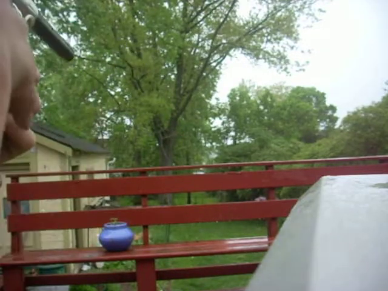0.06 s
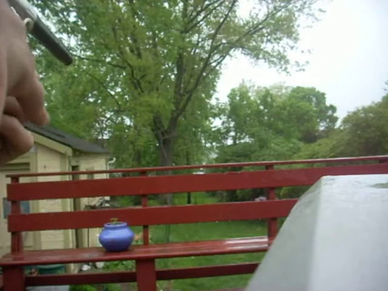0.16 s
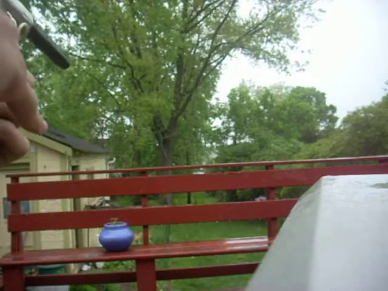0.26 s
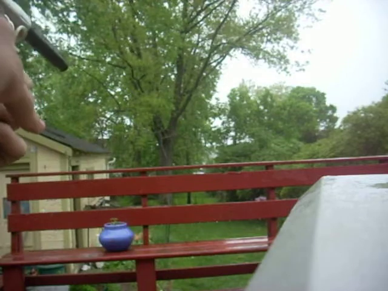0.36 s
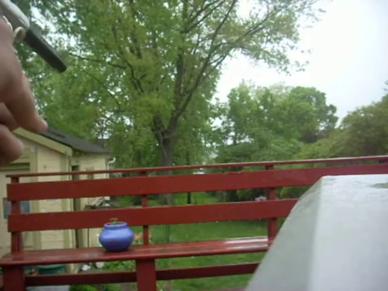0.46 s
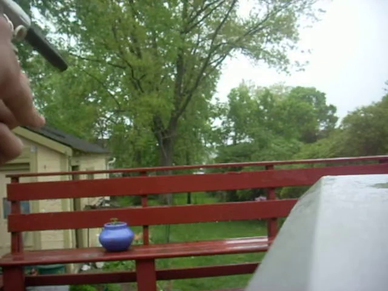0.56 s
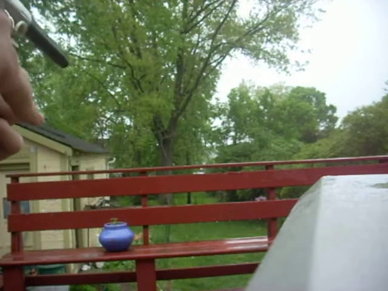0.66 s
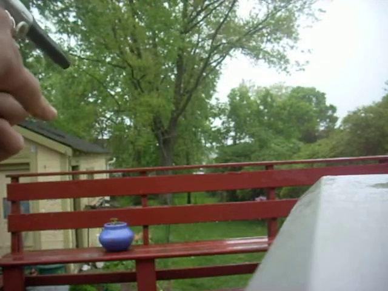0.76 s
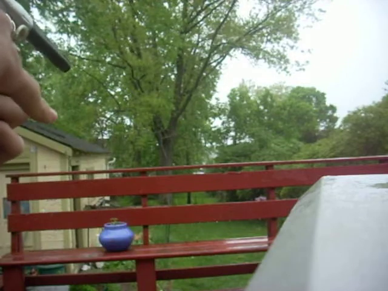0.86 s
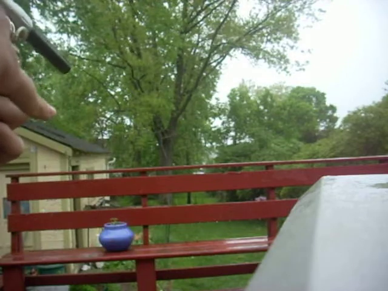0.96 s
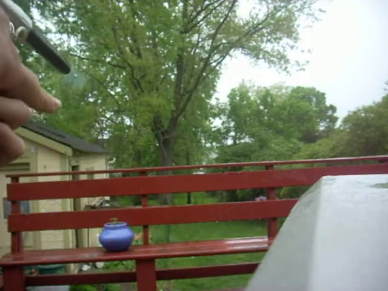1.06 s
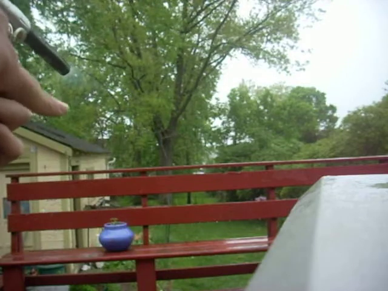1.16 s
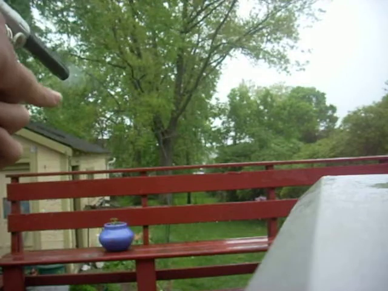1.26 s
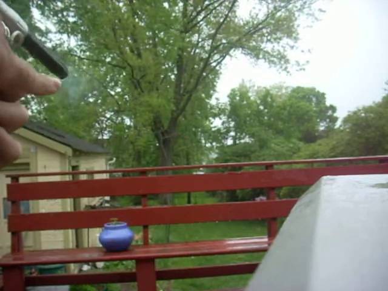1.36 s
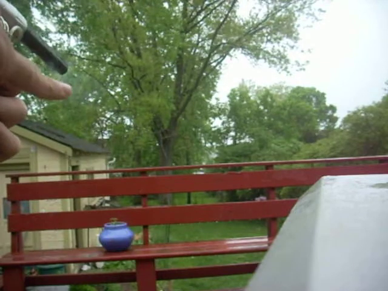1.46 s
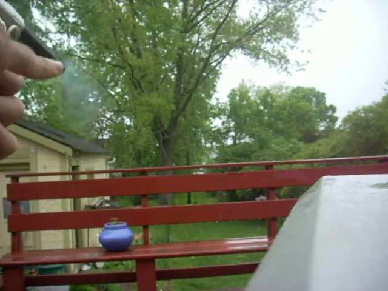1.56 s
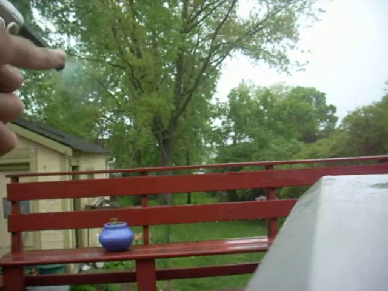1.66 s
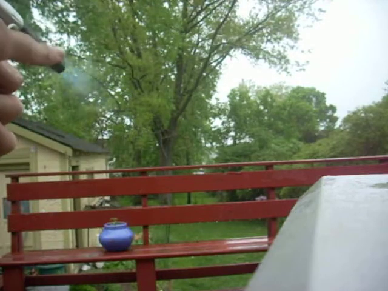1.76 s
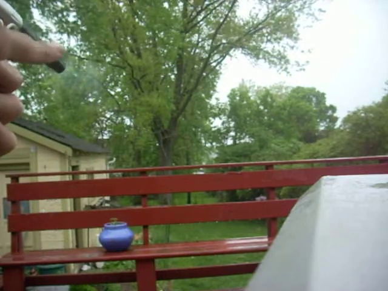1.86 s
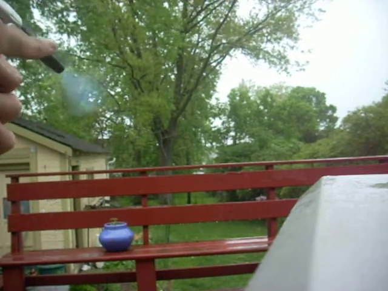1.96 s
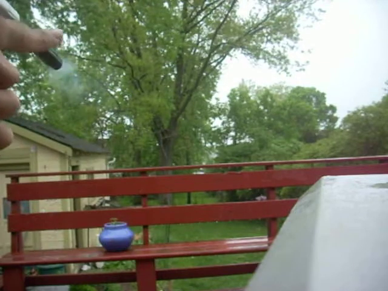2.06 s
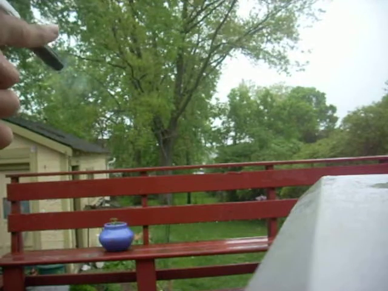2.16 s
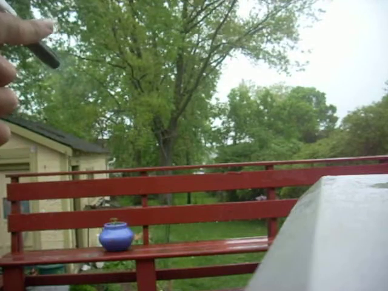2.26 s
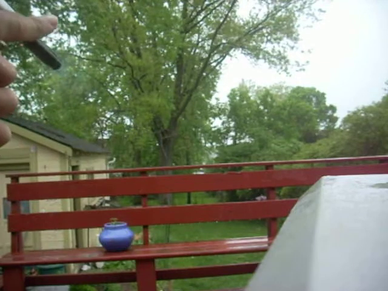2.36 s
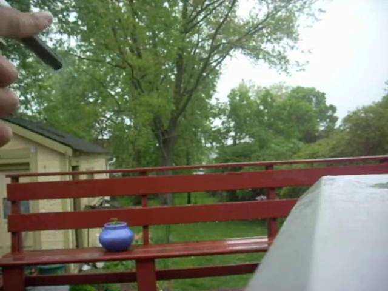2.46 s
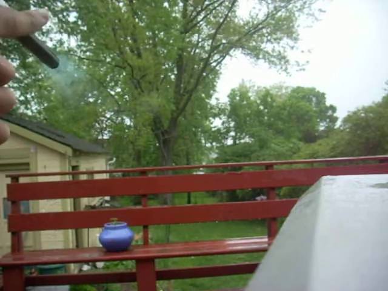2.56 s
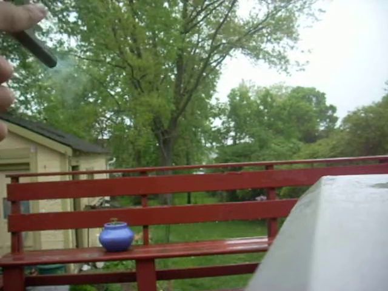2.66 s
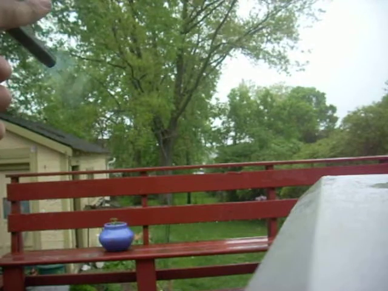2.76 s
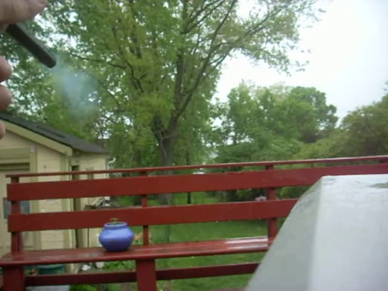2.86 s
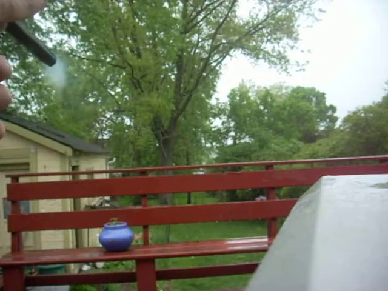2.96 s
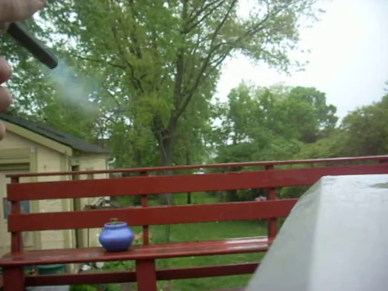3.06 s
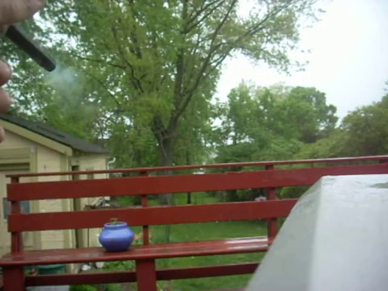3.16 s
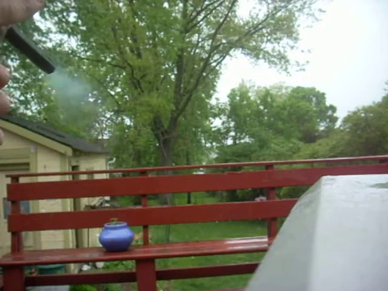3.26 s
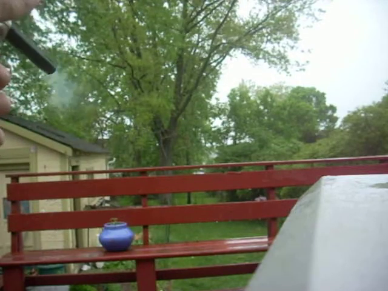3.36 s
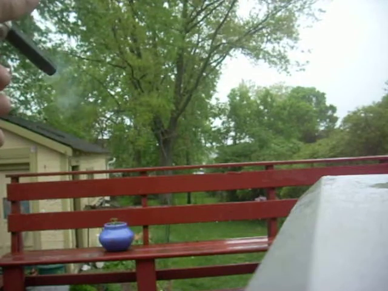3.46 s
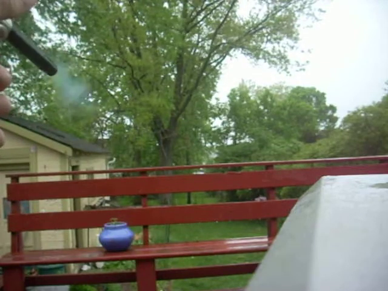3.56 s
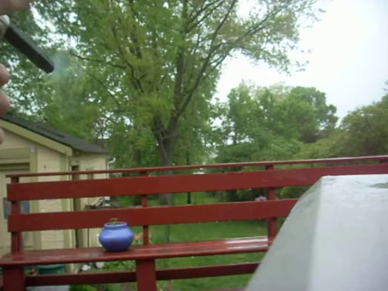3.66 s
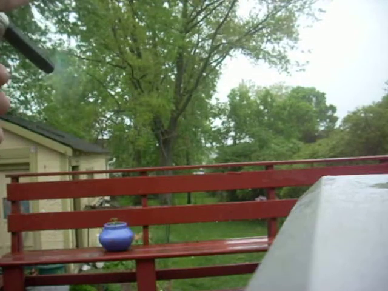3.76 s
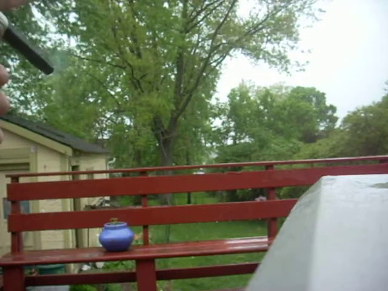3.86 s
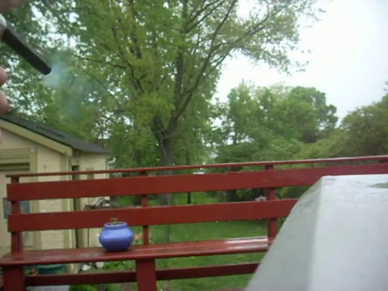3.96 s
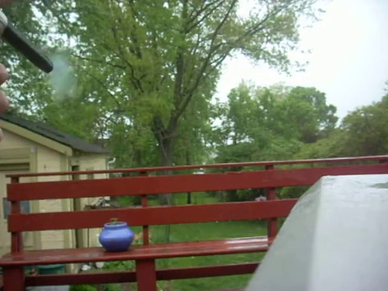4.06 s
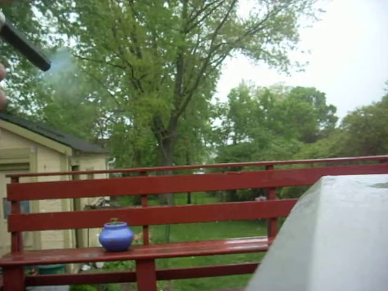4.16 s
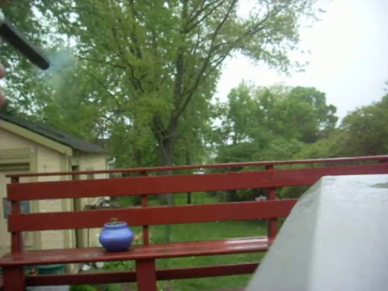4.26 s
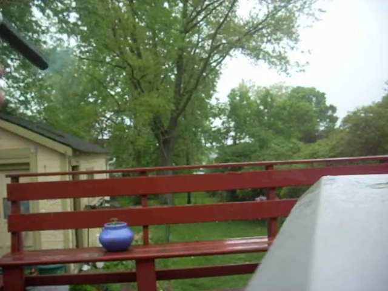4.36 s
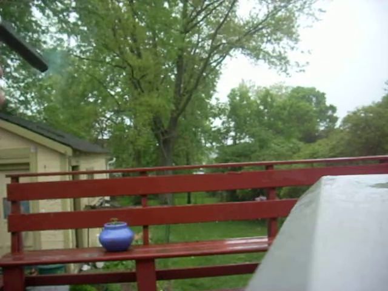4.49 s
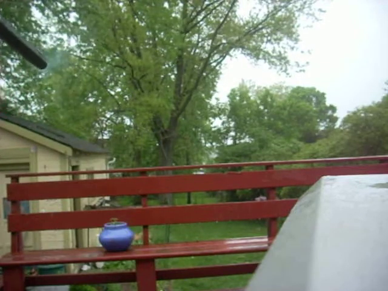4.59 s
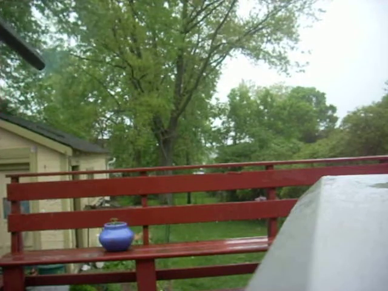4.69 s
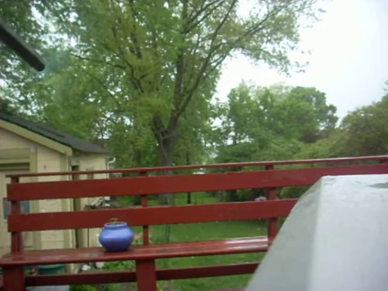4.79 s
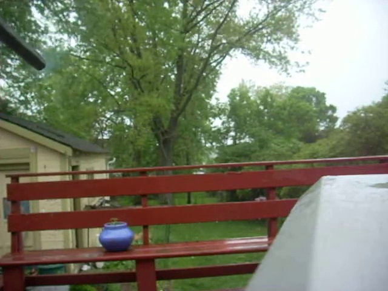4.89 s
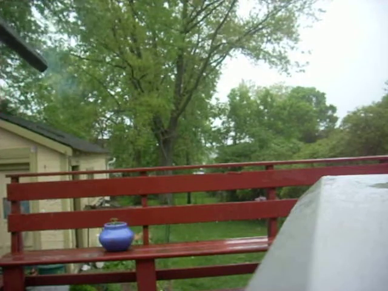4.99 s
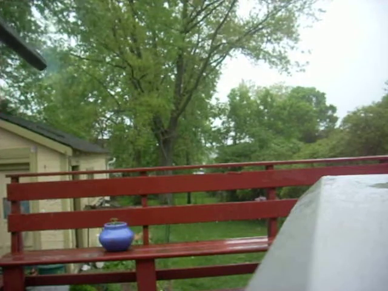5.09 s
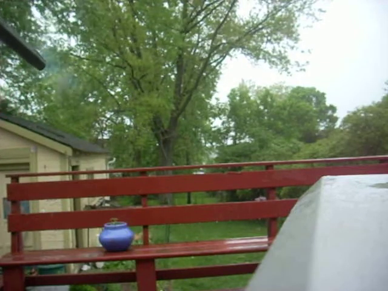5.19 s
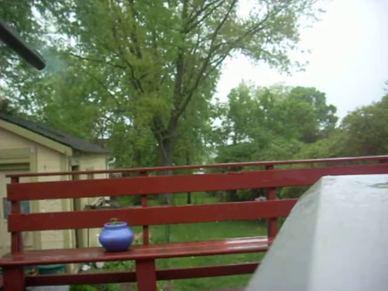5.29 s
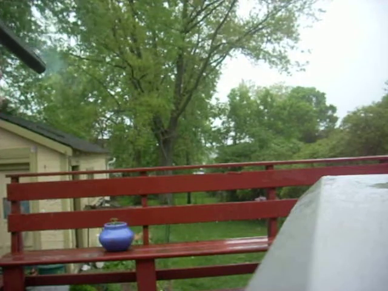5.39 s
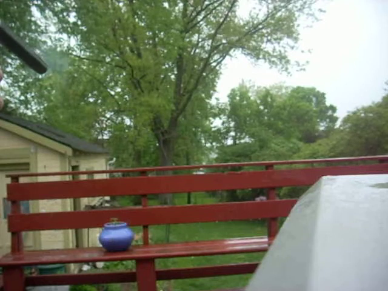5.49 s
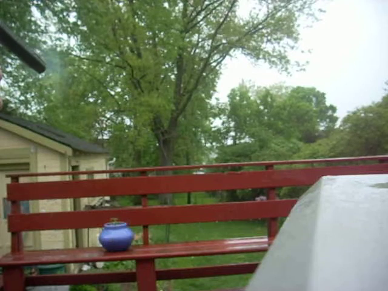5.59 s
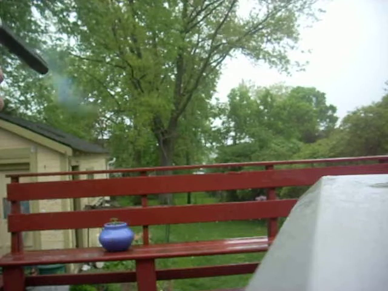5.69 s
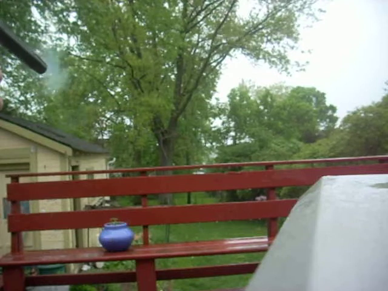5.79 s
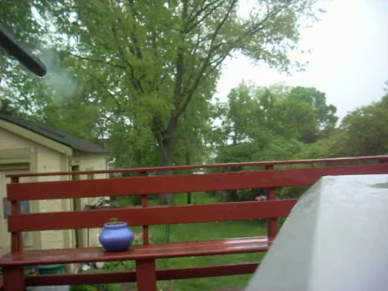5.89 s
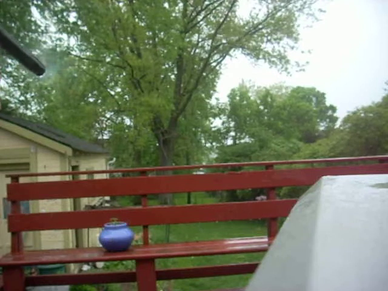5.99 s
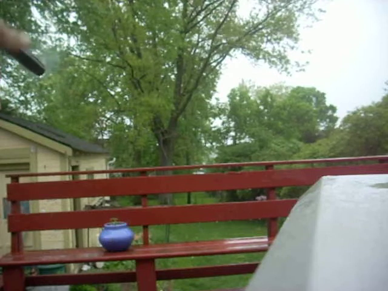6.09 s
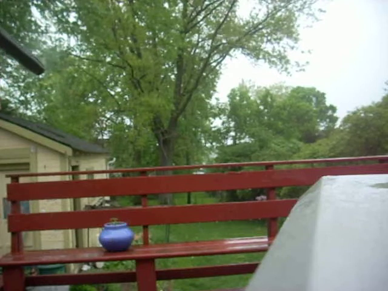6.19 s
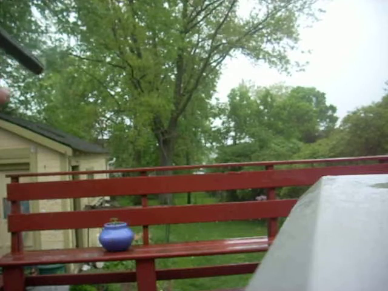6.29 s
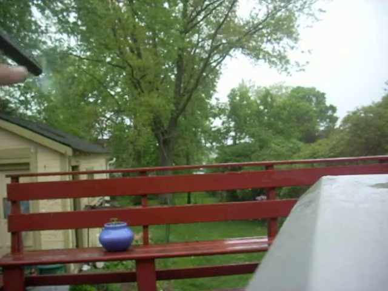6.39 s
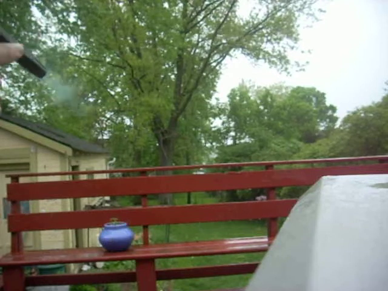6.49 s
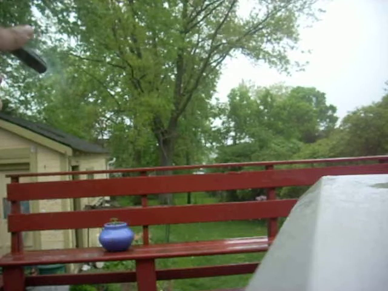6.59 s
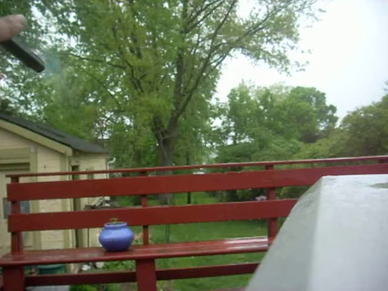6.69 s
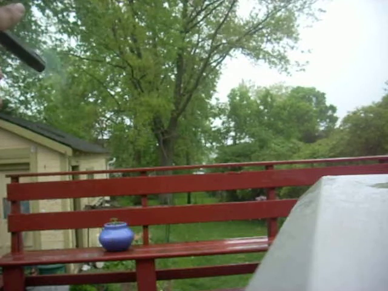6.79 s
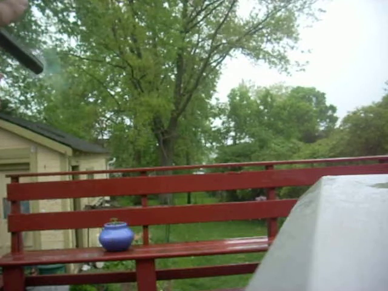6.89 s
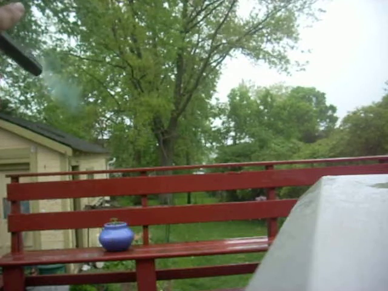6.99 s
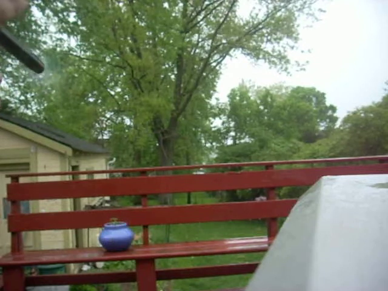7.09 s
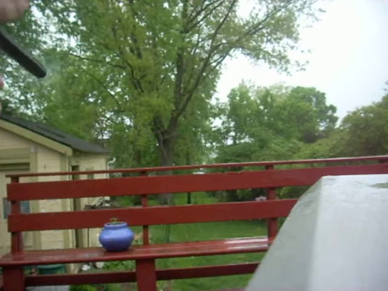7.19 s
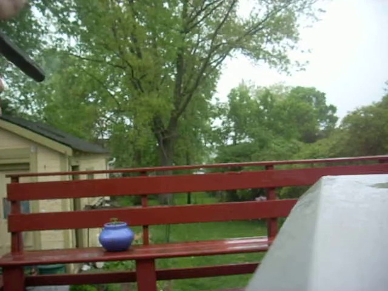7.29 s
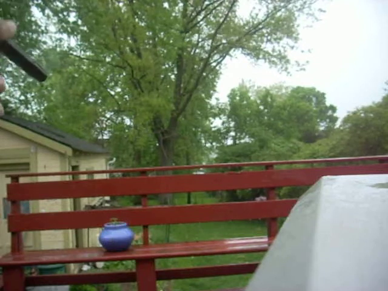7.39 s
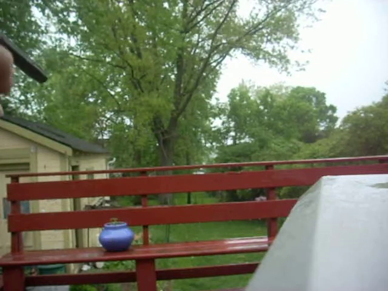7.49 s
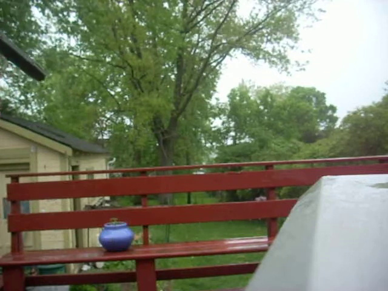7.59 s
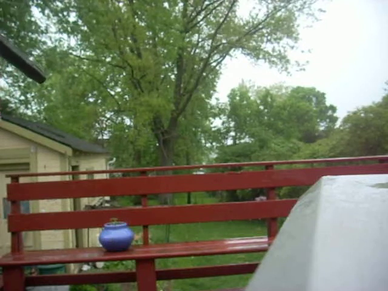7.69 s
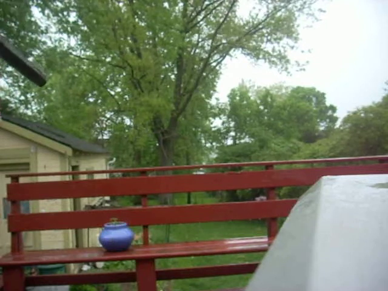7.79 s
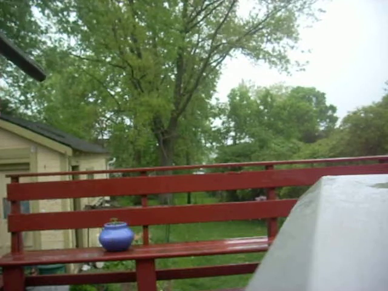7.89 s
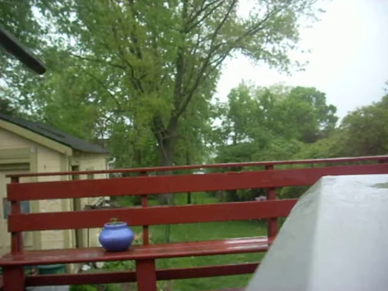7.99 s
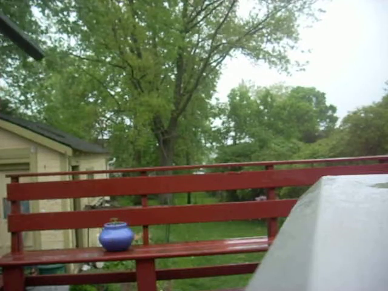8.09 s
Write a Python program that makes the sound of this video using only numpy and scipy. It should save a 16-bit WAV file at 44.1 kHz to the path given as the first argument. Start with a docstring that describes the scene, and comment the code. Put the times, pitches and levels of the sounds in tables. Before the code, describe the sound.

Close gas-powered shots thump and clack about six times a second on a garden deck, with a short second burst and faint buzzing hiss.

```python
"""Paintball marker in a damp garden

From a wooden deck, close to a small camera microphone: a long string of shots, then five more.
Each shot is a shaped blast of gas noise over a hollow thump of ringing barrel and deck modes.
The parts strike, rebound and rattle: the bolt is thrown back, the trigger ticks, the bolt clacks shut.
Decaying noise gives the echoes of deck and garden; hiss and a faint pulsed buzz lie below.
The camera hears little above 4 kHz and overloads on every shot."""
import sys
import numpy as np
from scipy import signal
from scipy.fft import rfft, irfft
from scipy.io import wavfile

SR = 44100
rng = np.random.default_rng(int(sys.argv[2]) if len(sys.argv) > 2 else 0)


def store_wav(level_fs):
    """Save 16-bit WAV to argv[1]."""
    pcm = np.round(np.clip(np.atleast_2d(level_fs), -1, 1) * 32767)
    wavfile.write(sys.argv[1], SR, pcm.T.astype(np.int16))


N = 359194
TIME = np.arange(N) / SR
AGE = TIME[:SR // 4]   # time since a hit
BAND_EDGE_HZ = 4090   # top of the band the camera hears

# firing cycles: (shot time [s], bolt closing time [s], relative force of closing [dB])
FIRING_CYCLES = [(0.993, 1.163, -11), (1.297, 1.443, -5.5), (1.508, 1.611, -1), (1.734, 1.882, -8),
                 (1.941, 2.032, -1), (2.103, 2.209, 0.5), (2.286, 2.389, -7), (2.471, 2.616, -11.5),
                 (2.671, 2.778, -10), (2.84, 2.953, -3.5), (3.009, 3.131, -6), (3.205, 3.298, -0.5),
                 (3.369, 3.483, -4.5), (3.546, 3.654, -4.5), (3.718, 3.839, -7), (3.906, 4.013, -4),
                 (4.081, 4.21, -.5), (4.262, 4.379, 0.5), (4.436, 4.556, -0.5), (4.611, 4.723, -3.5),
                 (4.795, 4.904, -.5), (4.979, 5.094, -0.5), (5.161, 5.269, 0), (5.331, 5.454, -4),
                 (5.512, 5.632, -2), (5.686, 5.797, -2.5), (5.869, 5.989, 0.5), (6.33, 6.425, -6.5),
                 (6.477, 6.584, -6.5), (6.649, 6.75, -1), (6.815, 6.923, -4.5), (6.986, 7.093, -1.5)]
# air column of the barrel and the deck under it: (frequency [Hz], relative level [dB], t60 [s])
BARREL_MODES = [(88, -38, 0.038), (128.2, -9.5, 0.065), (175.6, -8, 0.05), (258.5, -13.5, 0.072),
                (345.5, -14.5, 0.099), (402.4, -17, 0.13), (455.3, -7.5, 0.064), (529, -11.5, 0.042),
                (601, -19.5, 0.097)]
# colour of the escaping gas: (frequency [Hz], relative level per Hz [dB])
GAS_SPECTRUM = [(40, -10.5), (280, -13), (520, -8), (830, -2), (1060, -3.5), (1230, -10), (1550, -9.5),
                (1900, -1.5), (2380, 0.5), (2700, -5), (3100, -3), (3700, -9), (4400, -9)]
BLAST_DB, THUMP_DB, SHOT_SPREAD_DB = -3, 2.5, 0.93   # every shot lets out nearly the same charge of gas


def shots(lead_s=0.001339, thump_lead_s=0.00038, rise_s=0.0011, dwell_s=0.011, gas_t60=0.06,
          hammer_db=-24, hammer_s=0.0064, hammer_t60=0.084):
    """The hammer is let go; then the valve opens, dwells and lets the gas die away; the pulse rings the barrel."""
    out = np.zeros(N)
    for shot_s, _, _ in FIRING_CYCLES:
        blast_db, thump_db = rng.normal([BLAST_DB, THUMP_DB], SHOT_SPREAD_DB)
        opening = np.minimum(AGE / rise_s, 1) ** 2
        flow = opening * fade(AGE - roughly(dwell_s), gas_t60)
        blast = flow * noise(GAS_SPECTRUM, len(AGE))
        hammer = fade(AGE, hammer_t60) * noise(GAS_SPECTRUM, len(AGE))
        thump = ring(BARREL_MODES, rng.normal(0, 0.95, len(BARREL_MODES)), detune=0.0063)
        add(out, shot_s - hammer_s, from_db(blast_db + hammer_db) * hammer)
        add(out, shot_s - lead_s, from_db(blast_db) * blast)
        add(out, shot_s - thump_lead_s, -from_db(thump_db) * thump)
    return out


# body of the marker: (frequency [Hz], relative level [dB], t60 [s])
MARKER_BODY_MODES = [(452, -24.5, 0.045), (610, -14.5, 0.012), (829.7, -19.5, 0.096), (911, -17, 0.041),
                     (1045, -16.5, 0.031), (1520, -35, 0.013), (1837, 0, 0.0049), (2180, 1.5, 0.0055),
                     (2341, -5.5, 0.015), (2924, -8.5, 0.013), (3388, -8.5, 0.016), (3656, -11, 0.034),
                     (4120, -2.5, 0.0053)]


def recock(stop_db=-6, travel_s=0.0105):
    """Each shot throws the bolt back; it hits its stop and the parts rattle."""
    out = np.zeros(N)
    for shot_s, _, _ in FIRING_CYCLES:
        knock = contact(MARKER_BODY_MODES, rebound_s=0.0036, rebound_db=-11, rattle_db=-18, rattle_t60=0.1)
        add(out, shot_s + travel_s, from_db(stop_db) * knock)
    return out


LOW_MODES_DB, TOP_MODES_DB = -5, -3   # weight of the outer modes in a full-force closing
LOW_DB_PER_DB, TOP_DB_PER_DB = 0.83, 0.89   # a gentler closing loses mostly its middle modes


def bolt(bolt_db=2, slide_db=-26, slide_s=0.012, bolt_lead_s=0.0005):
    """The bolt ticks as it starts to slide, then clacks shut and rings the marker's body."""
    out = np.zeros(N)
    for _, close_s, force_db in FIRING_CYCLES:
        low_db = LOW_MODES_DB - LOW_DB_PER_DB * force_db
        top_db = TOP_MODES_DB - TOP_DB_PER_DB * force_db
        slide = contact(TRIGGER_PART_MODES, rebound_s=0.002, rebound_db=-6, rattle_db=-16, rattle_t60=0.02)
        clack = contact(MARKER_BODY_MODES, rebound_s=0.003, rebound_db=-7.5, rattle_db=-20,
                        rattle_t60=0.088, low_db=low_db, top_db=top_db)
        add(out, close_s - slide_s, from_db(force_db + slide_db) * slide)
        add(out, close_s - bolt_lead_s, from_db(force_db + bolt_db) * clack)
    return out


# stray finger ticks on the trigger, mostly before the first shot and after the last:
# (time [s], relative level [dB])
FINGER_TICKS = [(0.0987, -24), (0.1168, -1.5), (0.2665, -20), (0.2713, -19), (0.3529, -20.5),
                (0.5174, -32.5), (1.2161, -29), (6.1983, -27.5), (7.2153, -21), (7.3548, -24.5),
                (7.527, -26.5)]
# trigger: (frequency [Hz], relative level [dB], t60 [s])
TRIGGER_PART_MODES = [(858, -15, 0.025), (1780, -15, 0.0083), (2310, -6.5, 0.0096), (2966, -8.5, 0.014),
                      (3190, -7, 0.012), (3760, -4.5, 0.0046)]
RESET_DB, RESET_SPREAD_DB = -11, 0.5   # the trigger ticks back once in every cycle
# the tick comes before the bolt closes: a fixed time plus a share of the stroke
RESET_LEAD_S, RESET_LEAD_SHARE = 0.0155, 0.145


def trigger(trigger_db=-2, trigger_lead_s=0.00056):
    """The trigger part strikes and rattles as it resets, and at stray touches of the finger."""
    out, resets = np.zeros(N), []
    for shot_s, close_s, _ in FIRING_CYCLES:
        reset_s = close_s - RESET_LEAD_S - RESET_LEAD_SHARE * (close_s - shot_s)
        resets.append((reset_s, rng.normal(RESET_DB, RESET_SPREAD_DB)))
    for s, db in resets + FINGER_TICKS:
        tick = contact(TRIGGER_PART_MODES, rebound_s=0.009, rebound_db=-9.5, rattle_db=-7.5, rattle_t60=0.06)
        add(out, s - trigger_lead_s, from_db(db + trigger_db) * tick)
    return out


# dull knocks of the hand on the grip: (time [s], level [dB])
HAND_KNOCKS = [(0.199, -25.5), (0.217, -26), (0.231, -30), (0.241, -31.5), (0.268, -31)]
# grip: (frequency [Hz], relative level [dB], t60 [s])
GRIP_PART_MODES = [(825, -2.5, 0.027), (1040, -3, 0.021), (1300, -7.5, 0.017), (1760, -1.5, 0.0062)]


def hand():
    """The hand knocks the grip, which rings low and rattles."""
    out = np.zeros(N)
    for s, db in HAND_KNOCKS:
        knock = contact(GRIP_PART_MODES, rebound_s=0.0036, rebound_db=-21, rattle_db=-9.5, rattle_t60=0.11)
        add(out, s, from_db(db) * knock)
    return out


# colour of the echoes from boards and railing: (frequency [Hz], relative level per Hz [dB])
DECK_SPECTRUM = [(60, -33), (450, -3), (700, -4.5), (880, 5.5), (1050, -5.5), (1300, 5), (2200, -15.5),
                 (3500, -1), (4500, -7)]
# colour of the echoes from shed and trees: (frequency [Hz], relative level per Hz [dB])
GARDEN_SPECTRUM = [(30, -2), (150, -9), (450, -8.5), (750, 1.5), (920, 4), (1100, 3), (1400, 4.5),
                   (2200, -8.5), (3500, -2), (4500, -10)]


def garden(x):
    """Boards and railing answer at once; the shed and trees add a longer, thin tail."""
    deck = scatter(x, DECK_SPECTRUM, wet_db=-13, t60=0.11, near_s=0.0051, build_s=0.0068)
    trees = scatter(x, GARDEN_SPECTRUM, wet_db=-14.5, t60=0.48, near_s=0.0072, build_s=0.024)
    return deck + trees


# faint electrical buzz: (pulse rate [1/s], delay [s], width [s], relative level [dB], jitter [s])
BUZZ_TRAINS = [(29.63, 0.0016, 0.0056, -36.5, 0.00036), (29.66, 0.013, 0.0014, -34.5, 0.00026),
               (48.6, 0.00528, 0.0015, -35, .0012)]


def buzz(uneven_db=3):
    """Load on the camera's supply leaks into its preamp: dips and spikes that jump and ramp back."""
    out = np.zeros(N)
    for k, (rate, delay_s, width_s, db, jitter_s) in enumerate(BUZZ_TRAINS):
        jump = np.minimum(AGE / width_s * 6, 1)
        ramp = np.maximum(1 - AGE / width_s, 0)
        pulse = -(-1) ** k * jump * ramp
        for s in np.arange(delay_s, TIME[-1] - 0.02, 1 / rate):
            late_s = jitter_s * rng.standard_normal()
            add(out, s + late_s, from_db(db + uneven_db * rng.standard_normal()) * pulse)
    return out - out.mean()


# colour of the background hiss: (frequency [Hz], relative level per Hz [dB])
HISS_SPECTRUM = [(20, -29), (150, -20), (450, -15), (900, -18), (1500, -20), (2800, -22.5), (3500, -21),
                 (4300, -32.5)]


def hiss():
    """Steady coloured noise; rms 1."""
    return noise(HISS_SPECTRUM, N)


def contact(modes, rebound_s, rebound_db, rattle_db, rattle_t60, low_db=0, top_db=0, spread_db=1.54):
    """A part strikes, rebounds once and rattles to rest in uneven grains; every touch rings the modes."""
    hz = np.array(modes)[:, 0]
    grains = rng.standard_normal(len(AGE)) * (rng.random(len(AGE)) < 0.04)
    force = from_db(rattle_db) * grains * fade(AGE, rattle_t60)
    add(force, 0, np.ones(1))   # the strike itself
    add(force, roughly(rebound_s), from_db([rebound_db]))
    low_weight = 1 / (1 + (hz / 1600) ** 4)
    top_weight = 1 / (1 + (3400 / hz) ** 10)
    colour_db = low_db * low_weight + top_db * top_weight
    gains_db = colour_db + rng.normal(0, spread_db, len(hz))
    return signal.fftconvolve(force, ring(modes, gains_db, detune=0.012))[:len(AGE)]


def ring(modes, gains_db, detune):
    """Struck modes, neighbours in opposite phase."""
    hz, db, t60 = np.transpose(modes)
    hz = hz * (1 + detune * rng.standard_normal(len(hz)))
    heights = from_db(db + gains_db) * (-1) ** np.arange(len(hz))
    tones = np.sin(2 * np.pi * hz[:, None] * AGE)
    return heights @ (tones * fade(AGE, t60[:, None]))


def scatter(x, spectrum, wet_db, t60, near_s, build_s, count=4):
    """Outdoor echoes start after near_s, thicken and die away; their pattern shifts as the marker sways."""
    t, out = TIME[:SR * 3 // 5], np.zeros(N)
    for k in range(count):
        # the patterns take turns, crossfading at equal power every 0.2 s
        share = np.sqrt(np.maximum(1 - np.abs((TIME * 5 - k + 1) % count - 1), 0))
        echoes = noise(spectrum, len(t)) * np.clip((t - near_s) / build_s, 0, 1) * fade(t, t60)
        echoes /= np.sqrt(np.sum(echoes ** 2) * SR / 2 / BAND_EDGE_HZ)   # unit gain within the band heard
        out += signal.oaconvolve(x * share, echoes)[:N]
    return from_db(wet_db) * out


def noise(spectrum, size):
    """Noise with the given spectrum; rms 1."""
    hz, db = np.transpose(spectrum)
    bins = np.maximum(np.fft.rfftfreq(size, 1 / SR), 1)
    gains = from_db(np.interp(np.log(bins), np.log(hz), db))
    x = irfft(rfft(rng.standard_normal(size)) * gains, size)
    return x / np.std(x)


def fade(t, t60):
    """Falls 60 dB in t60."""
    return np.exp(-np.log(1000) * np.maximum(t, 0) / t60)


def roughly(value):
    """No two cycles of the mechanism take quite the same time: up to a quarter more or less."""
    return value * rng.uniform(0.75, 1.25)


def from_db(db):
    """Decibels to gain."""
    return 10 ** (np.asarray(db) / 20)


def add(track, s, sound):
    """Mixes a sound in at time s."""
    start = max(round(s * SR), 0)
    track[start:start + len(sound)] += sound[:N - start]


def scene(hiss_db=-50, buzz_db=2, carry_db=-5):
    """The muzzle fires out into the garden; the small noises of the action sound drier, with fainter echoes."""
    muzzle = shots()
    parts = recock() + bolt() + trigger() + hand()
    echoes = garden(muzzle + from_db(carry_db) * parts)
    background = from_db(hiss_db) * hiss() + from_db(buzz_db) * buzz()
    return (muzzle + parts + echoes + background)[None]


def record(dry, preamp_top=0.92, clip_top=0.72, cutoff_hz=16300):
    """The preamp saturates, the band is narrowed, and the overshoots clip into brief bright splashes."""
    driven = dry / (1 + (dry / preamp_top) ** 4) ** (1 / 4)
    narrow = signal.sosfiltfilt(signal.butter(16, BAND_EDGE_HZ, fs=SR, output="sos"), driven)
    clipped = np.clip(narrow, -clip_top, clip_top)
    return signal.sosfilt(signal.ellip(10, 0.1, 90, cutoff_hz, fs=SR, output="sos"), clipped)


dry = scene()
out = record(dry)
store_wav(out)
```